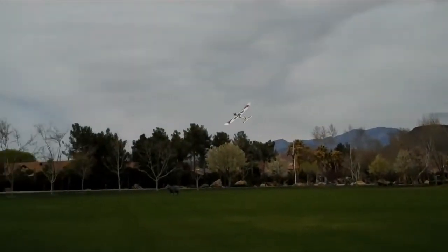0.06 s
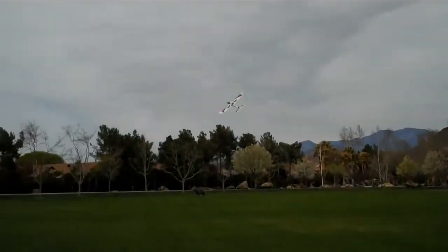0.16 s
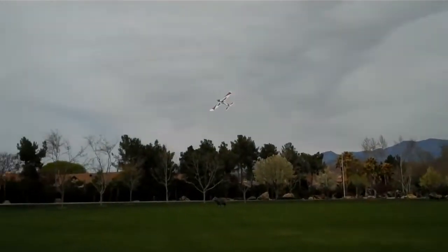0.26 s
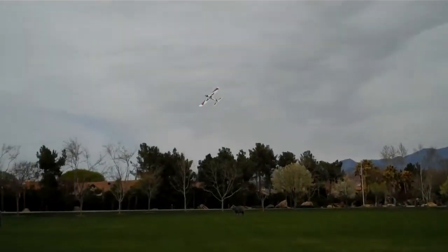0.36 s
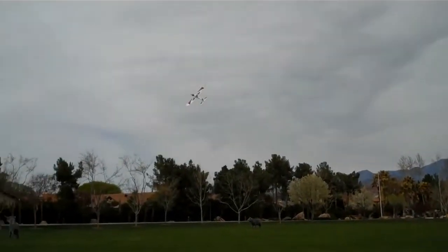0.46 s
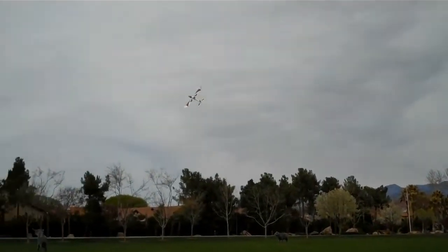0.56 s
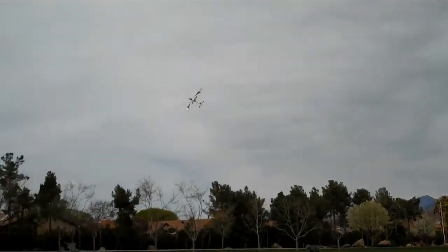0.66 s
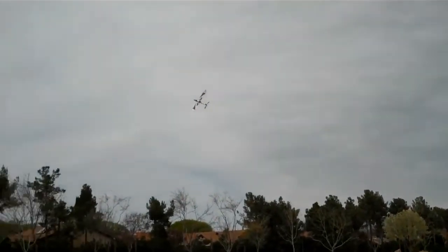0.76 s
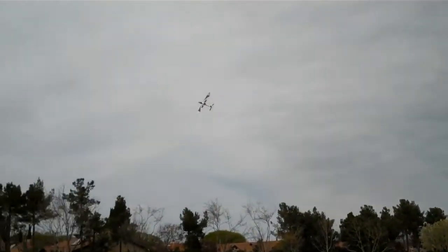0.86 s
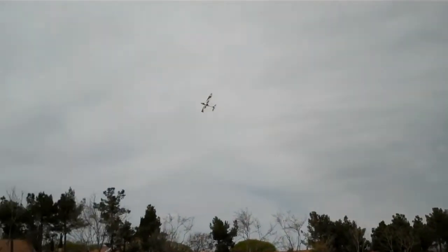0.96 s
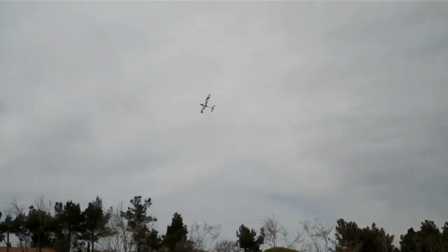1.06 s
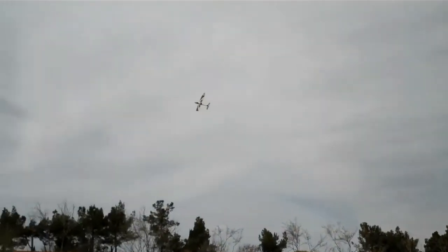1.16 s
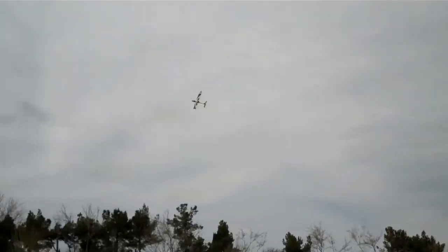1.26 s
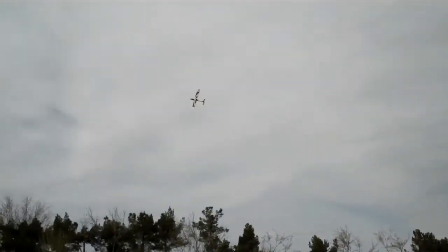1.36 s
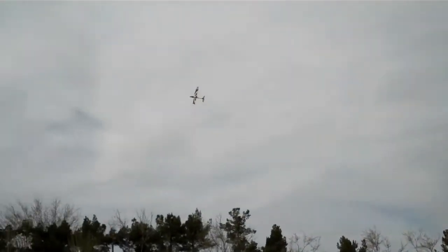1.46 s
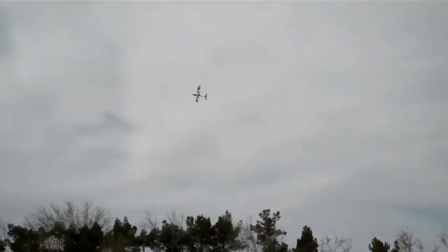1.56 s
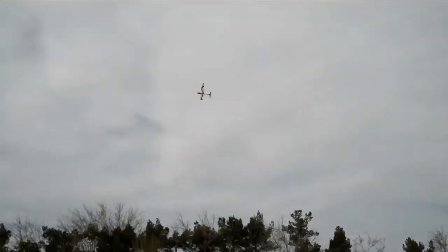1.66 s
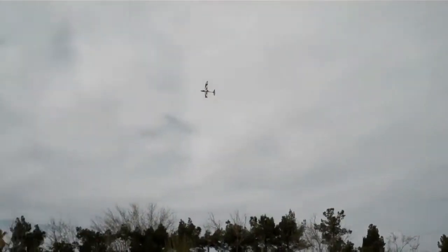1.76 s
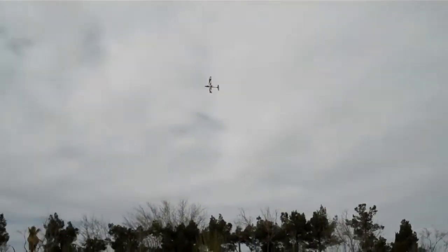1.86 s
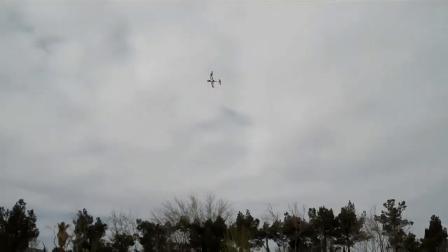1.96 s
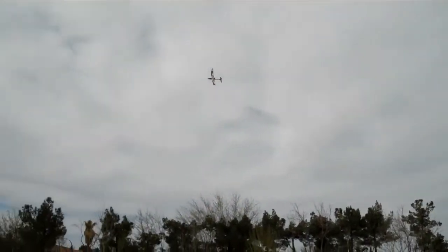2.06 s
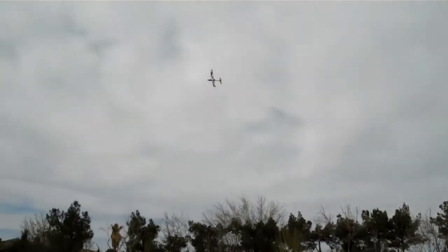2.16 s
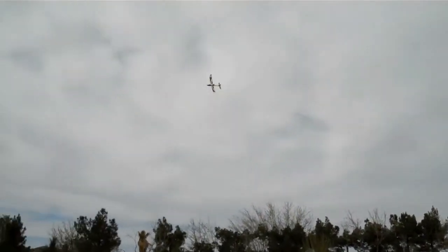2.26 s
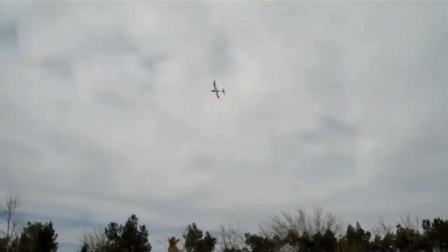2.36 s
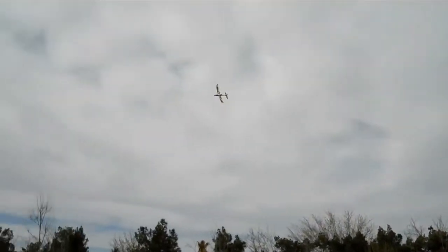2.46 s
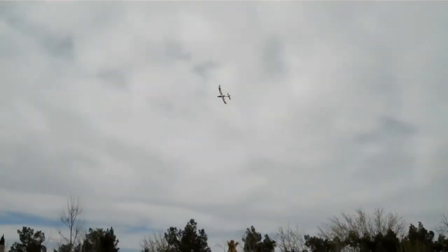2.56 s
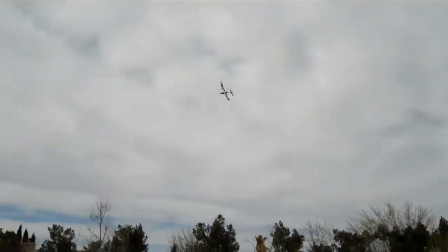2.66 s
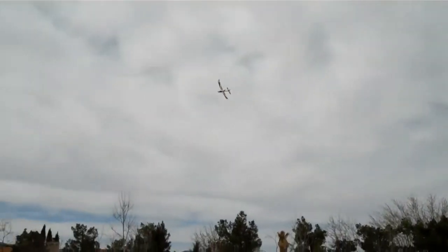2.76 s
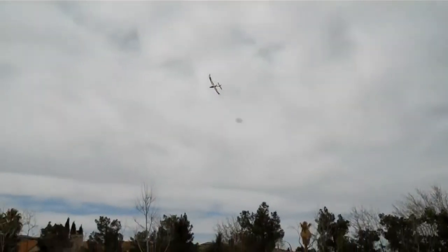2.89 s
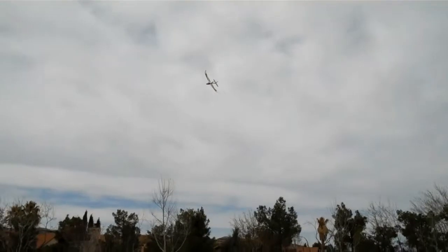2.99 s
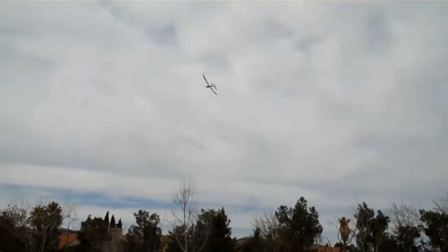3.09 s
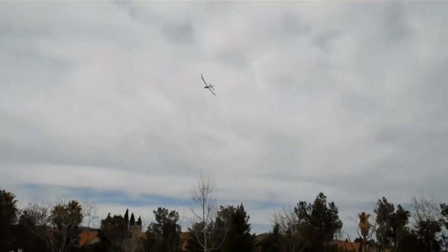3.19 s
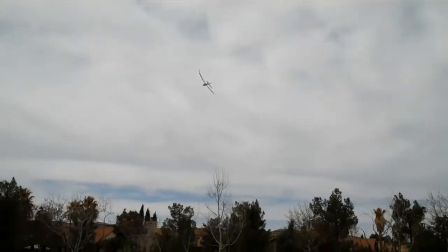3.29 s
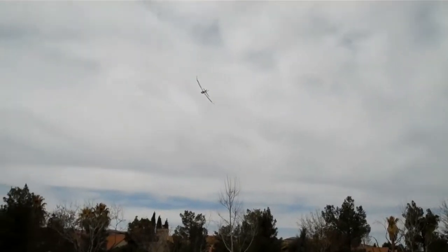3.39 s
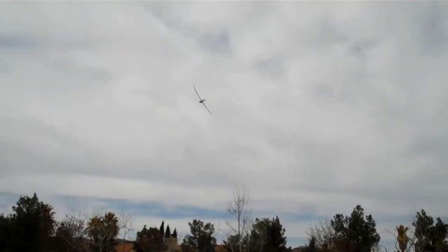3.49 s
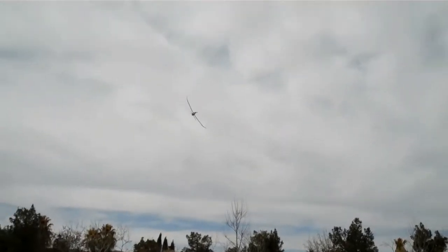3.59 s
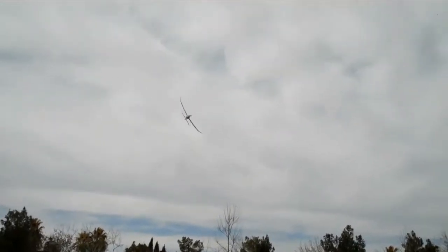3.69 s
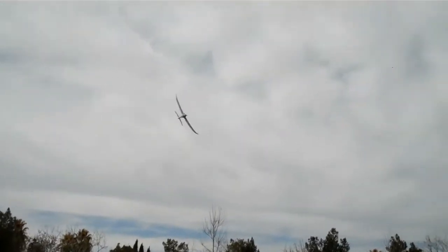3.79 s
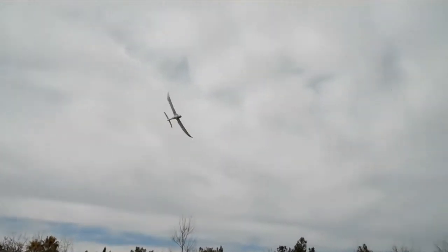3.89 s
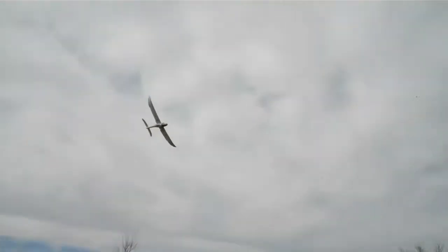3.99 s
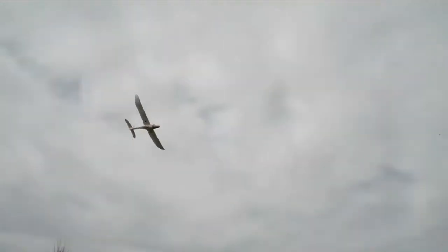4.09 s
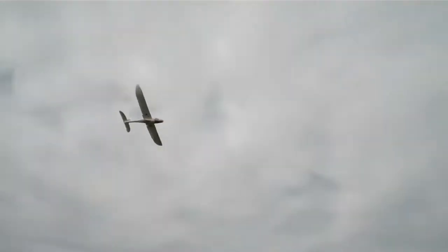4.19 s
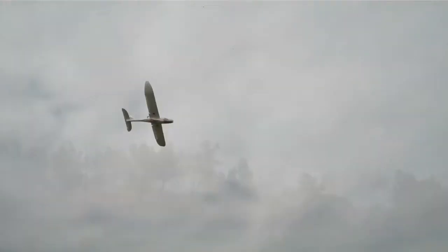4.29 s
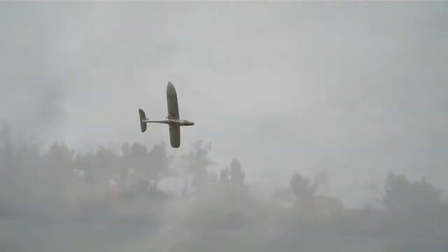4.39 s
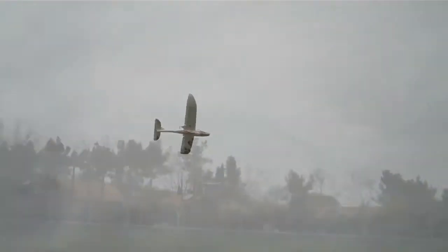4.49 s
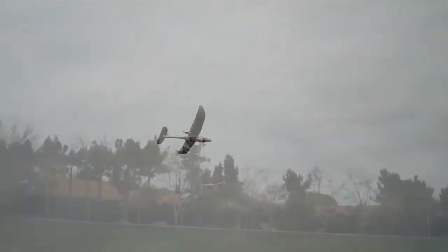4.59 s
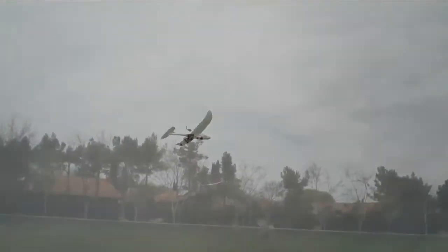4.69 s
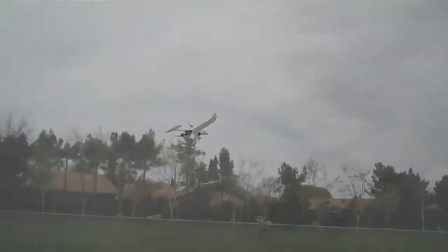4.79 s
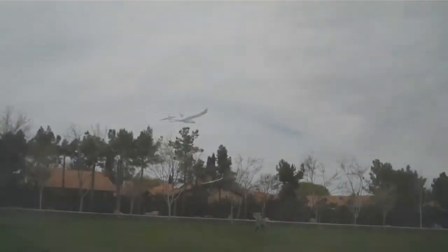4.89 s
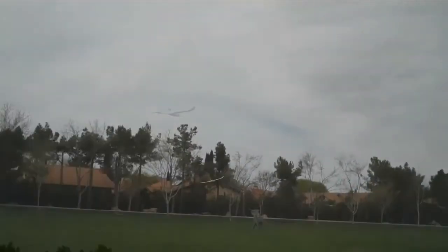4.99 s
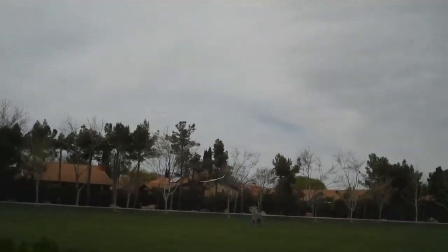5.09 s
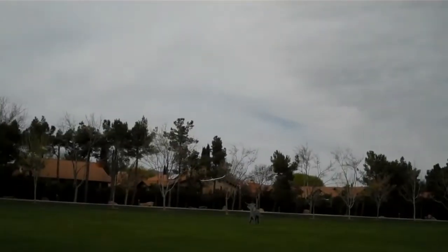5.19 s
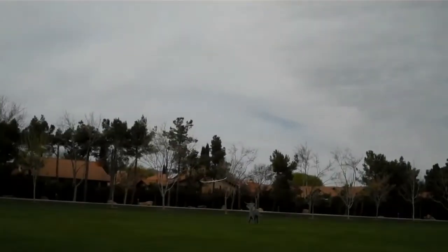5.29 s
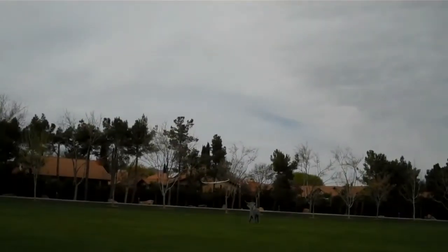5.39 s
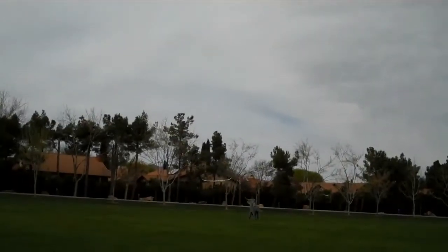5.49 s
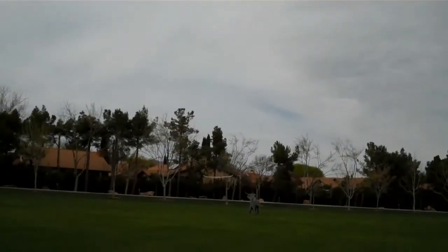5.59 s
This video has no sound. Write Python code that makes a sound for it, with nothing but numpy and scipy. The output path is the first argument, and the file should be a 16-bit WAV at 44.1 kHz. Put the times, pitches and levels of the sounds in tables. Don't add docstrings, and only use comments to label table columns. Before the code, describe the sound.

A small electric model plane flies over an open park, heard on a small handheld stereo microphone. From the start there is a hard, nasal, reedy buzz, a dense stack of harmonics over a shaft pitch near 290 Hz, with a raspy propeller chop and fine hiss. Over the first second it recedes a little; from 1.2 to 2.7 it is thinner and more distant, its tone colour turning and thin high whines coming and going. A low wind thump bumps the right side near 1.4, with small buffets after. From 2.8 the buzz swells quickly, rising slightly in pitch, loudest and roughest about 3.3 to 4.0. After 4.2 it weakens and the pitch slides down, clearly sagging from 4.5, becoming hollower. Around 5.15 the motor cuts and the buzz vanishes, leaving faint park air, soft wind and a swelling low traffic drone until 5.6.

```python
import sys
import numpy as np
from scipy import signal
from scipy.fft import rfft, irfft, next_fast_len
from scipy.io import wavfile
from scipy.ndimage import uniform_filter1d, map_coordinates

SR = 44100
rng = np.random.default_rng(int(sys.argv[2]) if len(sys.argv) > 2 else 0)


def invert_db(level):
    return 10 ** (np.asarray(level, dtype=float) / 20)


def generate_wav(sig):
    pcm = np.round(np.clip(np.atleast_2d(sig).T, -1, 1) * 32767).astype(np.int16)
    wavfile.write(sys.argv[1], SR, pcm)


N = 249165
T = np.arange(N) / SR

# time in seconds, nearness in dB, angle of view in radians.
FLIGHT = [(0.0, -5.3, -0.1), (0.2, -5, -1.0), (0.45, -7.5, -0.5), (0.75, -9, 0.38), (1.1, -9.5, 0.74),
          (1.3, -13, 1.35), (1.6, -13, 3), (1.95, -9.0, 3.5), (2.4, -9, 4), (2.75, -7.0, 3.5),
          (3.1, -0.5, 4.5), (3.5, 1.1, 6), (3.9, 1.1, 6.5), (4.1, -1.2, 7.5), (4.3, -4, 8), (4.55, -9, 8.5),
          (4.8, -11, 6.5), (5.15, -25.5, 7)]
# frequency in Hz, level in dB.
CHOP = [(300, -55), (800, -10.5), (1500, -1.5), (2500, 4), (3500, 4), (5000, -3), (7000, -16.5),
        (12000, -69)]
SMEAR = 0.02074


def plane():
    # time in seconds, shaft turns as heard in Hz.
    shaft_speed = [(0, 292.2), (.18, 290.9), (.36, 294.5), (.72, 290.3), (.9, 292.6), (.99, 290.4),
                   (1.17, 293.6), (1.77, 297.2), (1.96, 293.8), (2.55, 295.2), (2.88, 297.8), (3.3, 307.3),
                   (3.8, 314.4), (3.9, 313.3), (4.32, 298.2), (4.43, 288.8), (4.86, 263.5), (5.22, 228.4)]
    # frequency in Hz, level in dB.
    port_balance = [(150, -6.5), (400, 3), (2500, 3.5), (5000, 1.5), (12000, 1)]
    # frequency in Hz, lead in radians.
    port_lead = [(4800, 0.16), (6000, 0.4), (7500, 0), (10000, 1), (13000, 0.85)]
    turns = np.cumsum(curves(shaft_speed)[0]) / SR
    sources = shaft_orders(turns) + turbulence(turns)
    left, right = (lawn(side) for side in sources)
    return np.array([colour(left, port_balance, port_lead), right]) * invert_db(-2.19)


def shaft_orders(turns):
    # level when nearest in dB, gain end-on in dB, gain side-on in dB.
    low_orders = [(-53.5, -7.5, 14.5), (-43.4, 4.5, 6.5), (-39.5, -3, 1), (-34, -4.5, -1.5),
                  (-38.5, -4, 3.5), (-36.6, -0.6, -2), (-41.5, -5, 3.5), (-35, -2.3, 0.9), (-42, 1.1, -2.3),
                  (-40, 4.5, 0), (-44.0, -0.5, 3.5), (-45.5, 1.4, -0.5), (-45, -0.5, 9.5), (-44.5, 0, 0.5),
                  (-41.5, -3, 6), (-45.5, 0, -1.5)]
    # order number, level within the group in dB.
    high_orders = [(17, -10.4), (18, -9.9), (19, -10.0), (20, -16.1), (21, -11.9), (22, -15.6), (23, -19.0),
                   (24, -18.2), (25, -17.2), (26, -17.4), (27, -19.2), (28, -19.3), (29, -23.4),
                   (30, -22.6), (31, -19.8), (32, -20.9), (33, -23.1), (34, -23.6), (35, -24.4),
                   (36, -27.9), (37, -33.2)]
    # time in seconds, order, change in dB, half length in seconds.
    lobes = [(0.1, 9, -11, 0.34), (0.47, 14, -17, 0.3), (0.483, 1, 16, 0.52), (0.84, 6, 4, 0.74),
             (0.876, 15, 3, 0.55), (1.46, 12, 12, 0.28), (1.482, 1, -12.4, 0.13), (1.67, 7, -13, 0.27),
             (2.103, 3, -7, 0.29), (2.24, 8, -15.5, 0.83), (2.58, 7, -24, 0.41), (2.835, 4, -9.1, 0.38),
             (2.95, 14, -26, 0.14), (3.06, 12, -13, 0.08), (3.12, 6, -6, 0.34), (3.58, 10, -7.0, 0.22),
             (3.83, 15, -17, 0.23), (3.837, 8, -10, 0.32), (4.042, 11, -14, 0.08), (4.053, 13, -10.7, 0.16),
             (4.08, 4, -11, 0.07), (4.134, 6, -4, 0.07), (4.216, 8, 6.5, 0.086), (4.27, 2, -10.2, 0.22),
             (4.46, 15, -5, 0.28), (4.558, 12, 12, 0.07), (4.77, 2, 7.5, 0.26), (4.798, 7, 10.5, 0.15),
             (4.87, 5, 13, 0.14), (4.903, 12, 14, 0.18)]
    # time in seconds, order, change in dB, half length in seconds.
    further_swells = [(0.82, 34, 13, 0.4), (1.5, 35, 9, 0.62), (4.14, 10, -7, 0.069), (4.33, 4, 4, 0.046),
                      (5.6, 4, -12, 0.12), (1.8, 28, 11, 0.43), (2.6, 26, 3, .25), (4.7, 31, 6, 0.21),
                      (4.8, 32, 14, 0.12), (2.1, 17, 9, 0.7), (2.1, 18, 2.5, 0.4), (4.46, 13, 8, 0.06),
                      (4.44, 14, 10, 0.092), (5.04, 2, -19, 0.099), (5.0, 10, 4, .12), (0.43, 4, 6.5, 0.14),
                      (0.065, 2, -13, .1), (2.1, 5, 3, 0.23), (1.25, 31, 12, 0.88), (1.94, 23, 13, 0.18),
                      (2.0, 22, 4, 0.15), (4.22, 11, 2, 0.068), (4.25, 9, -8, 0.31), (1, 30, 1, 0.47),
                      (2.37, 14, 6, 0.42), (3.25, 14, 5.5, .12), (4.0, 10, 4.5, 0.039), (4.7, 3, 4.5, 0.085),
                      (4.14, 14, -6, 0.14), (.15, 4, -3, 0.096)]
    cut_s, cut_db_per_s = 5.15, -120
    high_db, high_share, high_tilt_db = -47, 0.58, 0.12

    slow = T[::64]
    near_db, view = (np.interp(slow, T, c) for c in curves(FLIGHT))
    near_db = near_db + cut_db_per_s * np.maximum(slow - cut_s, 0)
    fading = drift(2.4, count=38)[:, ::64]
    twinkle = drift(11, count=38)[:, ::64]

    order_db = {}
    for k, (db, end_on, side_on) in enumerate(low_orders, 1):
        order_db[k] = near_db + db + end_on * np.cos(view) + side_on * np.sin(view)
    group_db = high_db + np.minimum(high_share * near_db, near_db + 5.0)
    for k, db in high_orders:
        order_db[k] = group_db + db + high_tilt_db * (k - 17) + 3.8 * fading[k]
    for s, k, db, half in [*lobes, *further_swells]:
        order_db[round(k)] = order_db[round(k)] + db * bump(s, half, slow)

    phase = rng.uniform(0, 2 * np.pi, 38)
    out = np.zeros(N)
    for k in range(1, 38):
        stray = (0.5 + 0.5 * (k % 2) + (k > 12)) * phase[k] / np.pi
        start = np.pi + stray - SMEAR * k ** 2
        wobble = 0.079 * np.minimum(k, 13.5) * twinkle[k - 1]
        gain = np.sqrt(2) * invert_db(order_db[k] + 1.24 * twinkle[k])
        angle = 2 * np.pi * k * turns + start + np.interp(T, slow, wobble)
        out += np.interp(T, slow, gain) * np.cos(angle)
    return out


def turbulence(turns):
    # time in seconds, wake chop level in dB, airflow rush level in dB.
    wake_levels = [(0, -27, -57), (.39, -31, -41), (.8, -34, -39.5), (1.3, -35.5, -36.5),
                   (1.36, -39.5, -39), (1.72, -42, -42), (2.2, -43, -38.5), (2.63, -39.5, -36.5),
                   (3.01, -31.5, -36), (3.3, -28, -34.5), (3.87, -25.5, -33), (4.07, -28, -28.5),
                   (4.4, -29.5, -31), (4.55, -37, -39.5), (4.85, -35, -50), (5.08, -43.5, -42),
                   (5.22, -58, -44), (5.65, -58, -43)]
    # frequency in Hz, level in dB.
    rush_spectrum = [(150, -24.5), (350, -14.5), (600, -1), (1100, 0.5), (1800, -8.5), (3000, -17),
                     (6000, -63)]
    # frequency in Hz, level in dB.
    hiss_spectrum = [(2500, -28), (4000, -6), (6000, -8.5), (8000, -13.5), (10000, -16.5), (11000, -21),
                     (12500, -30), (14000, -54)]
    # time in seconds, change in dB, half length in seconds.
    tip_beams = [
        (.3, 1, .3),
        (1.45, 1.5, 0.26),
        (1.99, 6, 0.21),
        (2.802, 3.5, 0.12),
        (3.986, -8, .1),
        (4.628, 4.5, 0.25),
    ]
    strong_blade = 0.23

    chop_db, rush_db = curves(wake_levels)
    view = curves(FLIGHT)[1]
    hiss_db = -42.5 + (chop_db + 31.5)
    hiss_db = hiss_db + sum(db * bump(s, half) for s, db, half in tip_beams)
    sway_db = -39.3 + 1.15 * (chop_db + 30.5) - 0.5 * np.cos(view) - 0.5 * np.sin(view)
    uneven = 1 + strong_blade * np.cos(2 * np.pi * turns)

    def passage(sharpness):
        return np.exp(sharpness * (np.cos(4 * np.pi * turns) - 1)) * uneven

    chop = evened(colour(rng.standard_normal(N) * (0.83 + passage(2.1)), CHOP))
    rush = evened(colour(rng.standard_normal(N), rush_spectrum))
    gusts = drift(7.1)[0]
    body = invert_db(chop_db - 8 + 0.49 * gusts) * chop
    body = body + invert_db(rush_db - 10.5) * rush + invert_db(sway_db) * flutter(turns)

    shared, *apart = rng.standard_normal((3, N)) * (0.32 + passage(7.0))
    hiss = evened(colour(shared + 0.41 * np.array(apart), hiss_spectrum))
    return body + invert_db(hiss_db + 1.44 * gusts) * hiss


def flutter(turns):
    # time in seconds, sway rate in Hz.
    sway_rate = [(0, 37.07), (.8, 35.34), (1.4, 36.43), (3.0, 44.88), (3.5, 48.1), (4.0, 49.76),
                 (4.5, 47.66), (5.65, 40.1)]
    rate_hz = curves(sway_rate)[0] * (1 + 0.06 * drift(14.1)[0])
    sway = 2 * np.pi * np.cumsum(rate_hz) / SR
    out = np.zeros(N)
    for k in range(2, 19, 2):
        lean = np.clip(0.48 * (8.5 - k), -0.7, 0.7)
        blade = 2 * np.pi * k * turns - SMEAR * k ** 2
        out -= (1 + lean) * np.cos(blade + sway) + (1 - lean) * np.cos(blade - sway)
    lumps = invert_db(1.6 * drift(31.0)[0])
    return evened(colour(out * lumps, CHOP))


def lawn(x):
    lag_s = 0.001682 + 0.003346 * np.tanh(T / 2.0)
    echo = map_coordinates(x, [(T - lag_s) * SR], order=3, mode="nearest")
    return x - 0.44 * np.exp(-T / 2.25) * echo


def wind():
    # frequency in Hz, level in dB.
    buffet_spectrum = [(8.8, -51), (15, 0.5), (43, 3.5), (70, 3), (123, -6.5), (220, -18.5), (250, -20.5),
                       (320, -22), (550, -120)]
    # time in seconds, level in dB, half length in seconds, left over right in dB.
    gust_events = [(1.15, -58, 0.052, -8), (1.552, -41.5, 0.06, -8), (1.85, -52, 0.23, -7),
                   (2.108, -54, 0.17, 4), (.2, -66, 0.27, 5), (2.438, -49.5, 0.073, 5),
                   (2.668, -58, 0.12, -1), (3.025, -48, .06, -11), (3.304, -59, 0.14, 6),
                   (3.695, -63, 0.25, 12), (3.953, -61, 0.15, -12), (4.85, -58.5, .25, -10),
                   (5.325, -57.5, .25, 3)]
    # time in seconds, peak in dB, frequency in Hz, length in cycles, left over right in dB.
    thumps = [
        (1.337, -34, 90.5, 1, -21),
        (1.367, -24.5, 94, 2.4, -27),
        (1.523, -39, 60, 1, 13),
        (1.533, -46, 84, 1.4, -25),
        (1.556, -57, 75, 2.5, -29.5),
    ]
    breeze_db, breeze_rise_db_per_s = -69.5, 2
    sides = np.array([[0.5], [-0.5]])
    strength = invert_db(breeze_db + breeze_rise_db_per_s * T)
    strength = strength + sum(invert_db(db + sides * lean_db) * bump(s, half) for s, db, half, lean_db in gust_events)
    lumps = invert_db(3.9 * drift(16.0, count=2))
    buffet = evened(lumps * colour(rng.standard_normal((2, N)), buffet_spectrum))
    out = invert_db(4.0) * strength * buffet
    for s, db, hz, cycles, lean_db in thumps:
        envelope = np.exp(-(2.4 * hz * (T - s) / cycles) ** 2)
        swing = -np.cos(2 * np.pi * hz * (T - s)) * envelope
        out += invert_db(db + np.minimum(2 * sides * lean_db, 0)) * swing
    return out


def traffic():
    # time in seconds, level in dB, half length in seconds.
    swells = [
        (.2, -59, 0.62),
        (4.849, -58.5, 0.35),
        (5.35, -52, 0.32),
    ]
    # frequency in Hz, level in dB.
    drone_spectrum = [(50, -34), (85, -4.5), (105, 13.5), (135, -2), (200, -45)]
    strength = invert_db(-75) + sum(invert_db(db) * bump(s, half) for s, db, half in swells)
    drone = evened(colour(rng.standard_normal(N), drone_spectrum))
    return strength * invert_db(np.array([[1.0], [-1.0]])) * drone


def park():
    # frequency in Hz, level in dB per Hz.
    park_spectrum = [(50, -23), (100, -3), (150, -15), (250, -13), (450, -9), (800, -4), (1400, -11),
                     (2500, -18), (6000, -24), (11000, -39.5), (14000, -42)]
    # frequency in Hz, coherence from 0 to 1.
    likeness = [(60, 1), (180, 0.88), (520, 0.84), (1540, 0.7), (4550, 0), (13400, 0.3)]
    frames = N // 256 + 5
    hz = np.fft.rfftfreq(1024, 1 / SR)
    a, b, c, d, patches = rng.standard_normal((frames, 513, 5)).T
    patches = evened(uniform_filter1d(uniform_filter1d(patches, 8, 0), 10, 1))
    same = np.clip(read(likeness, hz), -1, 1)[:, None]
    left = a + 1j * b
    right = same * left + np.sqrt(1 - same ** 2) * (c + 1j * d)
    port_db = [[[1.2]], [[-1.2]]]
    z = np.array([left, right]) * invert_db(read(park_spectrum, hz)[:, None] + 1.77 * patches + port_db)
    return invert_db(-47.5) * evened(signal.istft(z, nperseg=1024, noverlap=768)[1][:, :N])


def evened(x):
    return x / np.sqrt(np.mean(x ** 2) + 1e-20)


def read(points, hz):
    f, value = np.transpose(points)
    return np.interp(np.log(hz + 1), np.log(f + 1), value)


def curves(rows):
    s, *columns = np.transpose(rows)
    return [np.interp(T, s, c) for c in columns]


def colour(x, points, lead=((1, 0), (2, 0))):
    size = next_fast_len(N)
    hz = np.fft.rfftfreq(size, 1 / SR)
    response = invert_db(read(points, hz)) * np.exp(1j * read(lead, hz))
    return irfft(rfft(x, size) * response, size)[..., :N]


def drift(rate_hz, count=1):
    knots = np.arange(2400) / 400
    roll_off = 1 + (np.fft.rfftfreq(2400, 1 / 400) / rate_hz) ** 4
    slow = irfft(rfft(rng.standard_normal((count, 2400))) / roll_off, 2400)
    return np.array([evened(np.interp(T, knots, s - s.mean())) for s in slow])


def bump(s, half, t=T):
    return np.exp(-((t - s) / max(half, 0.03)) ** 2)


def scene():
    return plane() + wind() + traffic() + park()


def low_pass(x):
    return signal.sosfilt(signal.butter(12, 14030, fs=SR, output="sos"), x)


def record(dry):
    return low_pass(dry)


dry = scene()
out = record(dry)
generate_wav(out)
```